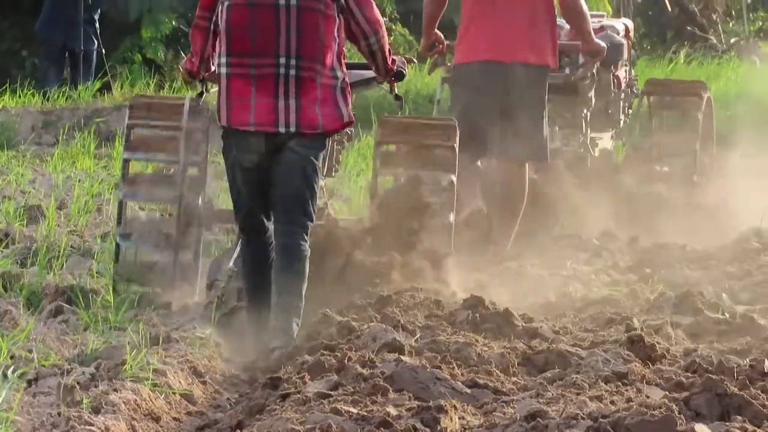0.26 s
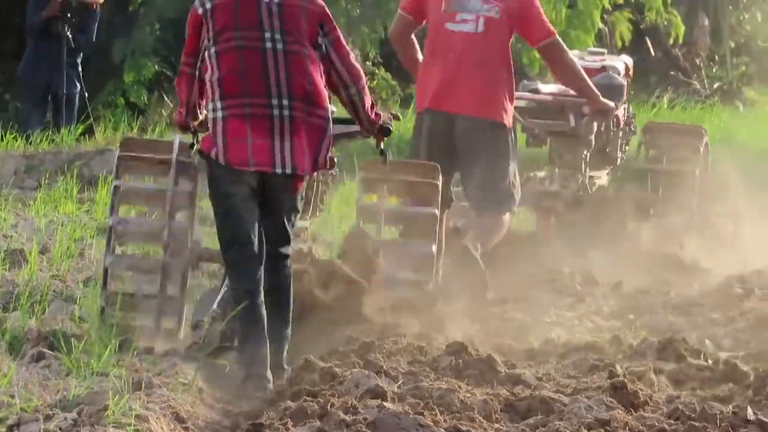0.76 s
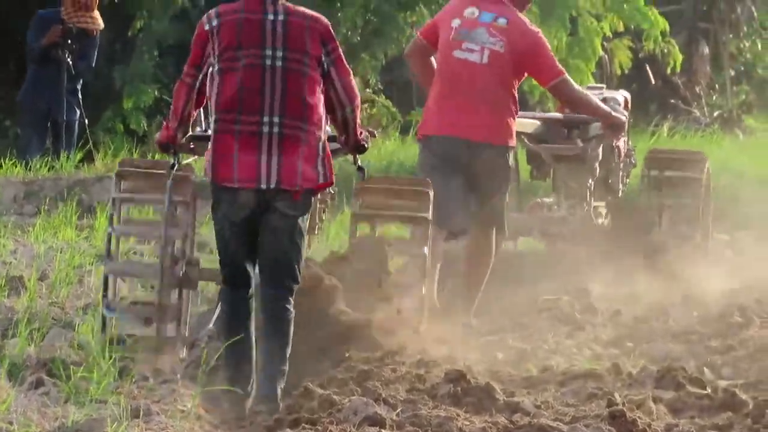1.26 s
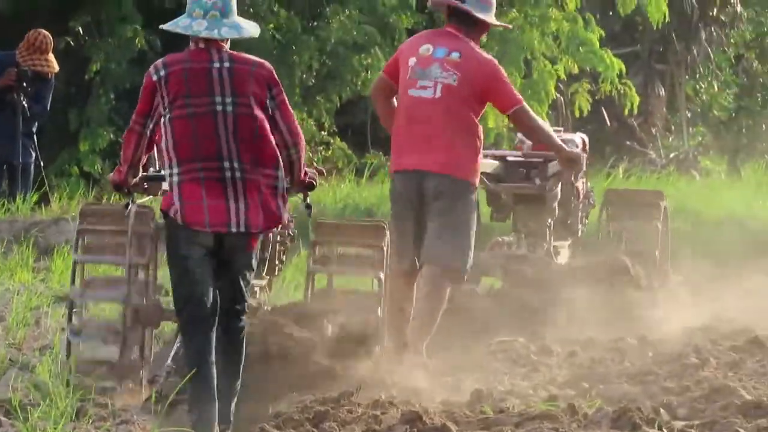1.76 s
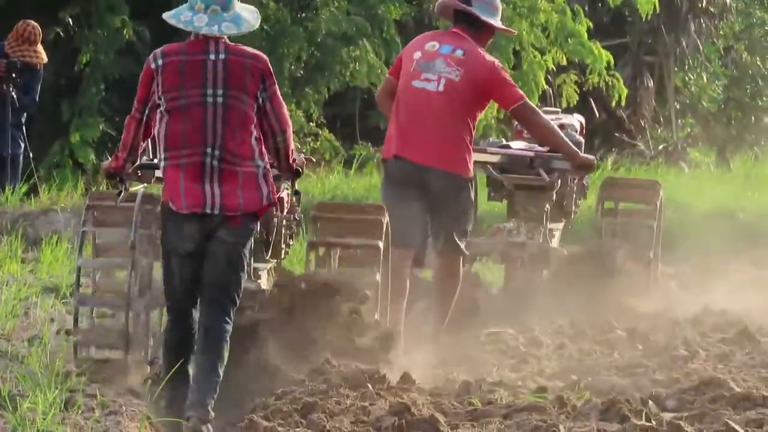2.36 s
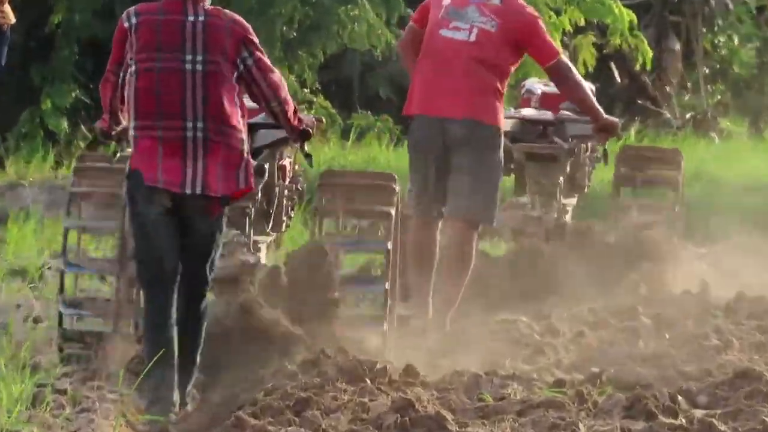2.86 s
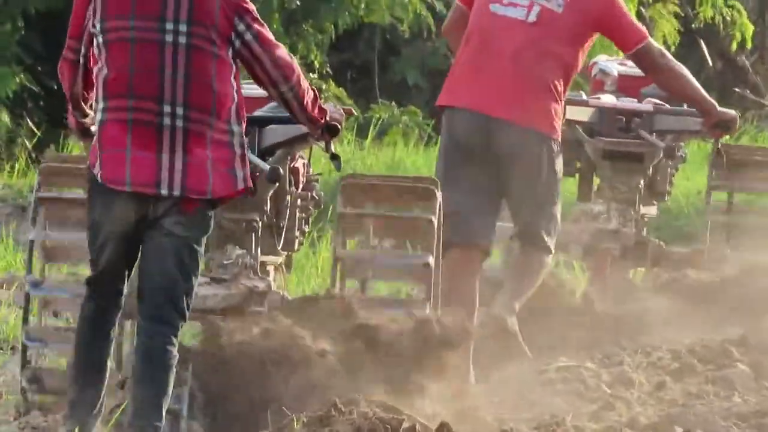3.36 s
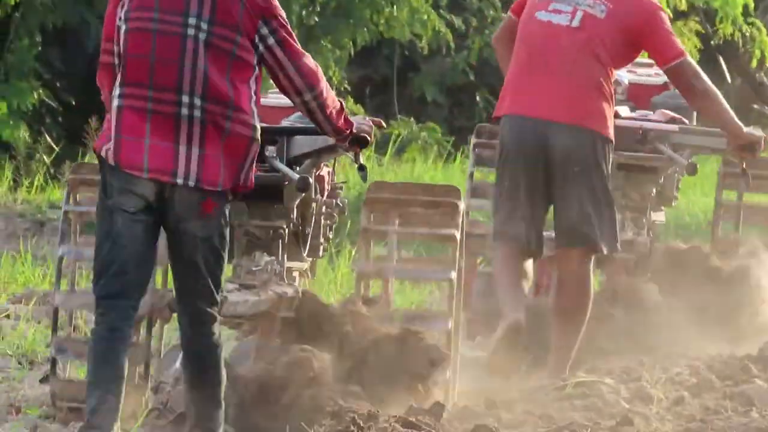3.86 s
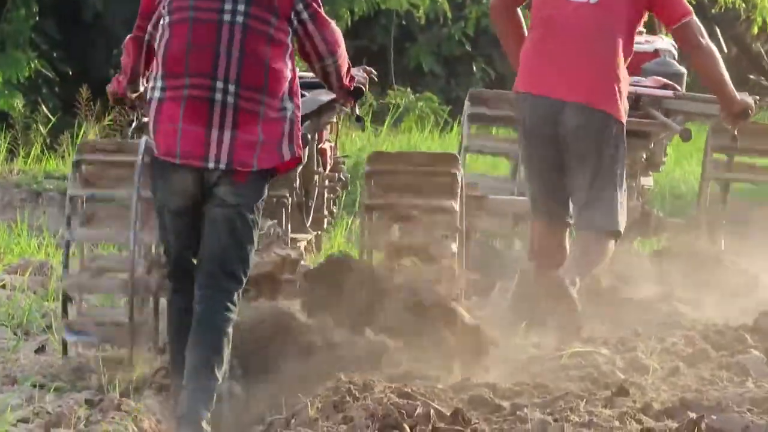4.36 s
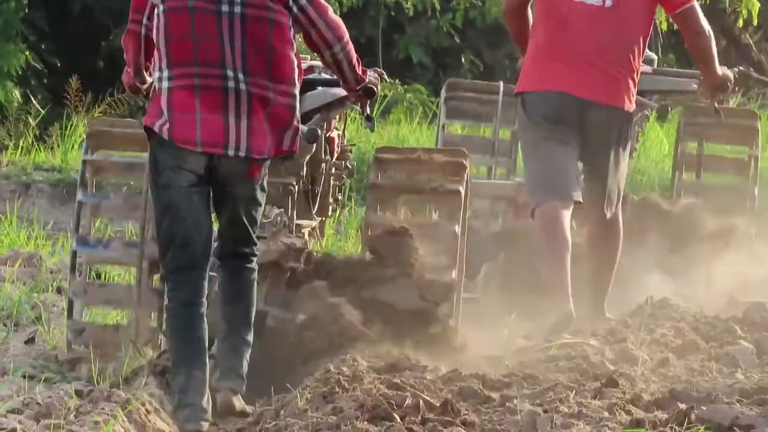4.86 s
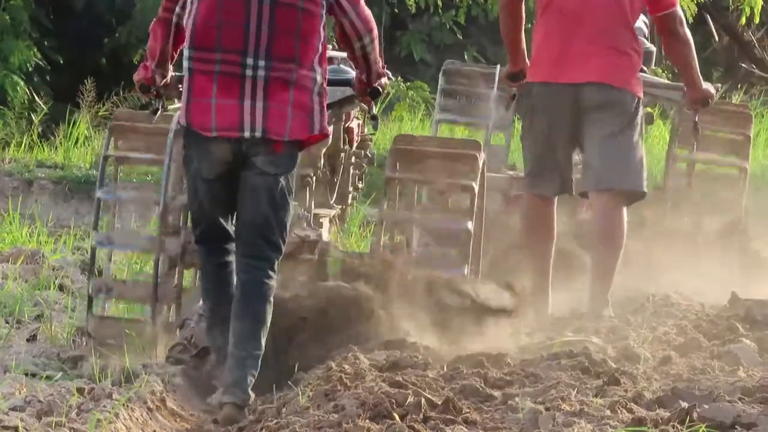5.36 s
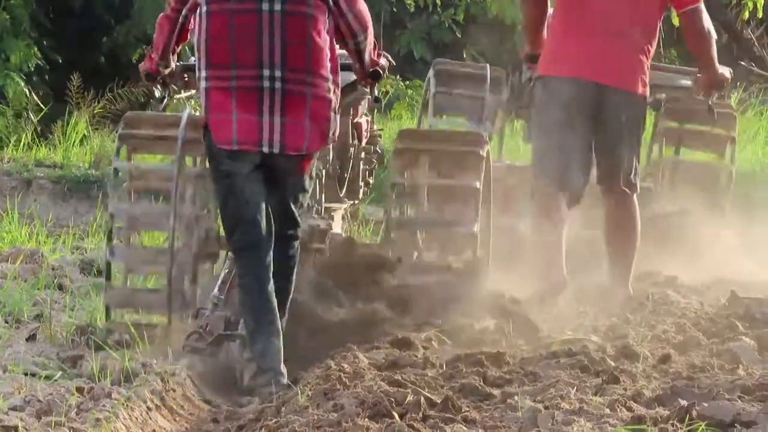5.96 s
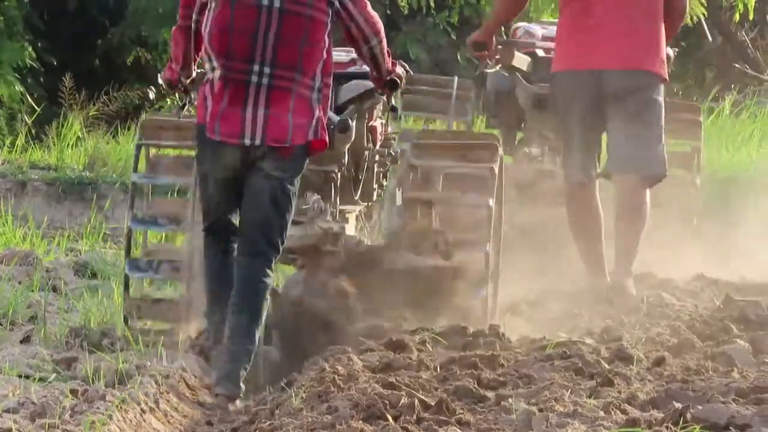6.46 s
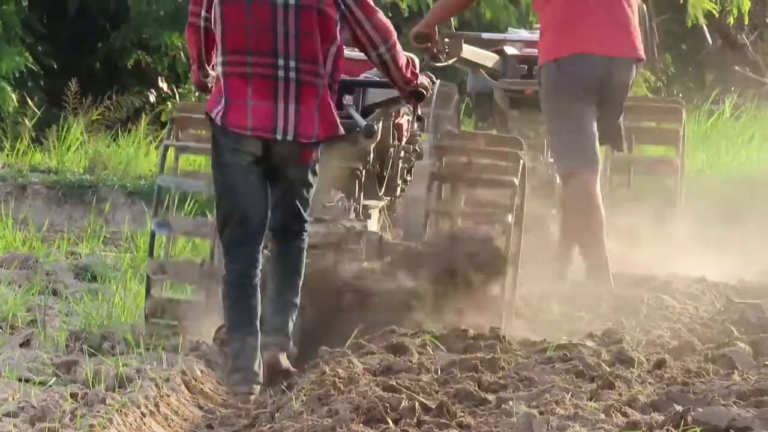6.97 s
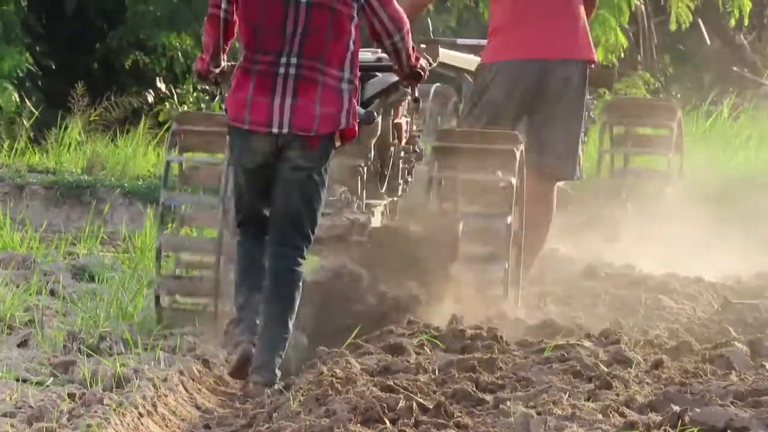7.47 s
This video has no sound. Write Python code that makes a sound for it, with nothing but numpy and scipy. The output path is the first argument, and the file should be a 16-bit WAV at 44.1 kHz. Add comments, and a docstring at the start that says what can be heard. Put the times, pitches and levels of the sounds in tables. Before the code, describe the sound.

From the start, two single-cylinder diesel walking tractors work outdoors, close to the microphone: one knocks sharply about ten times a second with bright ticks, the other more dully at nearly twelve. Their beats drift against each other inside a dense, ringing mid-range metal clatter, with loose-part rattle, thin valve ticks, a faint gear whine, soft exhaust rumble and light hiss. Small gusts thump low at 0.25-0.45 and 1.3 seconds. Knocking is strong from 1.3 to 2.6, then eases; at 2.9-3.4 the treble dulls, faint short squeaks pass, and hard metal strokes ring near 3.15. The duller engine sags to about ten and a half beats. The sharp one fades out by 4.8. Heavy wind buffeting bursts at 4.6-4.85, briefly at 5.1, and again at 6.05-6.3. Slightly quieter clatter and dull knocking continue, with a few lone ticks after 6.8, to the end around 7.7.

```python
"""Dense metal clatter and diesel knocking: two single-cylinder walking tractors plough a dry field.
Each firing is a noise burst with a bright tick; impacts ring casing resonators under a gear whine.
Loose parts rattle, valves tick and exhausts rumble; the soil returns clatter, rattle, knocks and ticks.
Gusts buffet the microphone with low thumps over faint hiss; a few squeaks glide past later."""
import sys
import numpy as np
from scipy import signal
from scipy.fft import rfft, irfft, next_fast_len
from scipy.io import wavfile
from scipy.ndimage import uniform_filter1d, map_coordinates

SR = 44100
rng = np.random.default_rng(int(sys.argv[2]) if len(sys.argv) > 2 else 0)


def waveform_to_disk(signal):
    """Save audio, clipped to [-1, 1], as 16-bit WAV at the path in sys.argv[1]."""
    frames = np.transpose(np.atleast_2d(signal))
    scaled = np.clip(frames, -1, 1) * 32767
    samples = np.round(scaled).astype(np.int16)
    wavfile.write(sys.argv[1], SR, samples)


N = 340893
TIME = np.arange(N) / SR


def undb(db):
    """Amplitude gain of a level in dB."""
    return 10 ** (np.asarray(db) / 20)


def level(x, db=0):
    """Scales x to an rms in dB."""
    return x * undb(db) / np.sqrt(np.mean(x ** 2))


def columns(table):
    """Columns of a curve table, interpolated to one value per sample."""
    s, *rest = np.transpose(table)
    return [np.interp(TIME, s, c) for c in rest]


def noise():
    """White Gaussian noise."""
    return rng.standard_normal(N)


def colour(x, spectrum):
    """Filters x by (Hz, dB) points, linear in dB over log Hz, closed outside them; rms 1."""
    size = next_fast_len(N)
    hz, db = np.transpose(spectrum)
    axis = np.log(np.arange(size // 2 + 1) * SR / size + 1)
    gain = undb(np.interp(axis, np.log(hz), db, left=-120, right=-120))
    return level(irfft(rfft(x, size) * gain, size)[:N])


def walk(rate_hz):
    """Random levels held 1 / rate_hz and slewed twice; spread near 1."""
    k = int(SR / rate_hz)
    held = np.repeat(rng.standard_normal(N // k + 1), k)
    return 1.3 * uniform_filter1d(uniform_filter1d(held, k), k)[:N]


def bursts(times_s, dbs, rise_s, fall_s):
    """Envelope that swells at each time and dies away exponentially."""
    starts = np.zeros(N)
    index = np.clip((np.asarray(times_s) * SR).astype(int), 0, N - 1)
    np.add.at(starts, index, undb(dbs))
    t = TIME[:SR // 8]
    shape = (1 - np.exp(-t / rise_s)) ** 3 * np.exp(-t / fall_s)
    return signal.oaconvolve(starts, shape / shape.max())[:N]


def blows(spread_db):
    """Gains of random blows, one per 128 samples; exponential in dB, capped."""
    size = np.minimum(rng.exponential(size=N // 128 + 1), 3.5)
    return np.repeat(undb(spread_db * size), 128)[:N]


def span(start_s, end_s, rise, fall):
    """Zero from start to end, sloping down before and after at rise and fall per s."""
    return np.minimum(0, rise * (TIME - start_s)) + np.minimum(0, fall * (end_s - TIME))


PATCH_HZ, PATCH_S = 430, .05  # grid on which the loudness of ringing parts varies


def patchy(spread_db):
    """Noise whose narrow bands come and go on their own, as when each blow rings other parts."""
    hz, s, z = signal.stft(noise(), SR, nperseg=512)
    cells = rng.standard_normal((int(hz[-1] / PATCH_HZ) + 2, int(s[-1] / PATCH_S) + 2))
    grid = np.meshgrid(hz / PATCH_HZ, s / PATCH_S, indexing="ij")
    db = map_coordinates(cells, grid, order=1)
    return signal.istft(z * undb(1.4 * spread_db * db), SR)[1][:N]


KNOCK_SCATTER_DB, TICK_SCATTER_DB = 1.5, 3  # largest departure either way


def firings(speed, wait_cycles, force, tick_db, bright=()):
    """One row per engine cycle: time s, knock dB, tick dB above it; knock and tick scatter independently."""
    rate_hz, = columns(speed)
    cycles = np.cumsum(rate_hz) / SR - wait_cycles
    s = np.interp(np.arange(int(cycles[-1]) + 1), cycles, TIME)
    knock = KNOCK_SCATTER_DB * rng.uniform(-1, 1, len(s))
    tick = TICK_SCATTER_DB * rng.uniform(-1, 1, len(s))
    for when_s, extra_db in bright:
        tick[np.argmin(abs(s - when_s))] = extra_db
    force_db = np.interp(s, *np.transpose(force))
    return np.transpose([s, force_db + knock, tick_db + tick - knock])


# Speed of the sharp engine. Each row: time in seconds, firings per second.
SHARP_SPEED = [(0, 10.096), (1.5, 10.209), (2.7, 10.053), (3.3, 10.197), (3.6, 10.363), (4.75, 10.457)]
# Its knock strength. Each row: time in seconds, level in dB.
SHARP_FORCE = [(0, -41), (.4, -41), (.7, -38), (1.0, -41.5), (1.4, -33.5), (1.7, -35.5), (2.0, -44),
               (2.2, -35.5), (2.6, -35), (2.76, -46.5), (3.2, -50), (3.55, -42), (3.95, -43), (4.1, -54),
               (4.35, -42), (4.62, -44), (4.8, -78)]
# Its brightest knocks. Each row: time in seconds, tick in dB above the usual.
BRIGHT_KNOCKS = [(.397, 9), (.891, 5), (1.382, 7.5), (1.775, 5), (2.168, 5), (2.366, 0), (3.453, 5),
                 (3.839, 5)]
SHARP_WAIT_CYCLES, SHARP_TICK_DB = .028, -11.5


def sharp_firings():
    """The engine with the sharp knock fires once per cycle at a nearly steady rate."""
    return firings(SHARP_SPEED, SHARP_WAIT_CYCLES, SHARP_FORCE, SHARP_TICK_DB, BRIGHT_KNOCKS)


# Speed of the engine that slows under load. Each row: time in seconds, firings per second.
SLOWING_SPEED = [(0, 11.59), (.7, 11.825), (1.7, 11.922), (2.6, 11.824), (3.1, 10.964), (4.3, 10.552),
                 (5.4, 10.386), (7.73, 10.42)]
# Its knock strength. Each row: time in seconds, level in dB.
SLOWING_FORCE = [(0, -32), (.2, -34.5), (.45, -38), (.85, -45), (1.1, -41), (1.3, -35.5), (1.75, -33),
                 (2.2, -36.5), (2.53, -35), (2.61, -43), (3.0, -43.5), (3.18, -37.5), (3.33, -39.5),
                 (3.41, -38), (4.0, -38), (4.25, -34), (4.6, -41.5), (4.95, -33), (5.2, -41), (5.5, -37),
                 (5.92, -38), (6.15, -44), (6.5, -35.5), (6.72, -40), (7.05, -34.5), (7.3, -34.5),
                 (7.5, -48), (7.73, -38)]
SLOWING_WAIT_CYCLES, SLOWING_TICK_DB = .858, -23


def slowing_firings():
    """The loaded engine fires once per cycle at a sagging rate."""
    return firings(SLOWING_SPEED, SLOWING_WAIT_CYCLES, SLOWING_FORCE, SLOWING_TICK_DB)


# Clatter level. Each row: time in seconds, level in dB.
CLATTER_LEVEL = [(0, -26), (.43, -28), (.95, -29), (1.68, -26), (2.56, -28.5), (2.82, -31), (2.91, -29),
                 (3.72, -30.5), (3.92, -28.5), (4.6, -30.5), (4.8, -32.5), (5.2, -30), (5.4, -32.5),
                 (6.4, -30.5), (6.85, -30), (7.73, -30)]
# Casing resonances. Each row: frequency in Hz, width in Hz, relative level in dB,
# change as the machines turn away in dB per s.
CASINGS = [(717, 205, -8.5, 0), (1005, 23, -5, 1.5), (1060, 46, -12, 0), (1115, 19.3, -1, -0.44),
           (1134, 47, -7, 1), (1240, 83, -8, -1), (1431, 115, -1.5, 0.6), (1590, 140, -10.5, 1.8),
           (1685, 18, -9, -1.2), (2273, 47, -4.5, 0), (2324, 38, -6, -1), (2346, 104, -6.5, 0),
           (2880, 57, -20, -0.5), (3300, 140, -16.5, 1)]
# Hardest metal strokes on the casings. Each row: time in seconds, level in dB above the clatter.
STROKES = [(.148, 3), (.229, -1), (.296, 5), (.321, 1), (.406, -1), (.583, -6), (.677, -4), (.753, 1),
           (.79, 3), (.924, 0), (.99, 3), (1.091, 6), (1.176, 2), (1.265, 2), (1.283, 6), (1.344, 7),
           (1.514, 0), (1.557, 5), (1.62, -3), (1.687, 9), (1.705, -1), (1.765, 5.5), (1.8, 0), (1.859, 2),
           (1.935, -1), (2.051, 6), (2.103, 0), (2.132, 5), (2.262, -1), (2.354, -6), (2.394, 1),
           (2.96, -1), (3.036, 1), (3.117, 4), (3.14, 10), (3.158, 6), (3.225, 8), (3.36, 7), (3.6, -2),
           (3.876, 2), (4.03, -4), (4.063, 0), (4.146, 3), (4.251, 0), (4.36, 8), (4.54, 3), (4.67, 5),
           (4.922, 3), (5.111, 1), (5.48, -2), (5.628, 3), (5.688, 2), (6.166, 1), (6.459, 2), (6.579, -3),
           (6.841, 4), (6.906, -4), (7.033, -9), (7.155, -9), (7.321, 7), (7.608, -4), (7.714, 3)]
# Broad clatter spectrum. Each row: frequency in Hz, relative density in dB per Hz.
CLATTER_SPECTRUM = [(200, -42), (300, -17), (450, -19), (700, -5.5), (900, -6.5), (1500, -6.5), (2100, -10),
                    (2700, -12), (3500, -26), (4200, -67)]
STROKE_RISE_S, STROKE_FALL_S = 0.0005, 0.0063
THROB_REF_DB, THROB_FOLLOWS = -21, 0.37  # reference knock; dB of throb per dB of knock
SWELL_SHARE, SWELL_FALL_S = .45, .06  # clatter of the loaded engine sags through each cycle
WAVER_SHARE, WAVER_RATE_HZ = .0035, 3  # casing pitch wanders
CASING_TOP_HZ = 3380
GEAR_HZ, GEAR_DB = 678, -17  # level relative to the clatter
SURGE_DB, SURGE_RATE_HZ = .5, 7.0


def casings(impacts, throb):
    """Noisy impacts drive resonators; a varying delay wavers their pitch."""
    rings = 0
    for hz, width_hz, db, turn_db_s in CASINGS:
        drift = undb(1.2 * walk(18) + .6 * walk(2.5))
        drive = noise() * impacts * drift * (1 + 0.15 * throb)
        ring = level(signal.lfilter(*signal.iirpeak(hz, hz / width_hz, SR), drive), db)
        ring = ring * undb(turn_db_s * (TIME - TIME.mean()))
        warped = TIME + np.cumsum(WAVER_SHARE * walk(WAVER_RATE_HZ)) / SR
        rings = rings + np.interp(warped, TIME, ring)
    return signal.sosfilt(signal.butter(8, CASING_TOP_HZ, fs=SR, output="sos"), rings)


def gear_whine():
    """Gear mesh: a sine with wandering pitch and level."""
    hz = GEAR_HZ * (1 + 0.00391 * walk(5))
    return undb(GEAR_DB + 1.5 * walk(3.96)) * np.sin(2 * np.pi * np.cumsum(hz) / SR)


def clatter(sharp, slowing):
    """Dense metal impacts, harder after each firing, ring the casings; a gear mesh whines."""
    s, knock_db, _ = np.r_[sharp, slowing].T
    throb = bursts(s, THROB_FOLLOWS * (knock_db - THROB_REF_DB), 0.00027, 0.0018)
    swell = bursts(slowing[:, 0], 0, .001, SWELL_FALL_S)
    strokes = bursts(*np.transpose(STROKES), STROKE_RISE_S, STROKE_FALL_S)
    impacts = blows(1.4) * np.hypot(1 + SWELL_SHARE * swell, strokes)
    rings = level(casings(impacts, throb))
    broad = colour(noise() * impacts * (1 + 0.052 * throb), CLATTER_SPECTRUM)
    clatter_db, = columns(CLATTER_LEVEL)
    gain = undb(clatter_db + SURGE_DB * walk(SURGE_RATE_HZ))
    return gain * (level(rings + undb(0.5) * broad) + gear_whine())


KNOCK_PATCH_DB = 2.5


def knocks(rows, spectrum, tick_spectrum, rise_s, fall_s, tick_fall_s, tail_db):
    """Diesel knock: a burst of a few ms, a brighter tick on top, and the block ringing on."""
    s, db, tick_db = np.transpose(rows)
    body = bursts(s, db, rise_s, fall_s) + bursts(s, db + tail_db, 0.0019, 0.01)
    tick = bursts(s - rise_s, db + tick_db, 2 * rise_s, tick_fall_s)
    body_noise = colour(patchy(KNOCK_PATCH_DB), spectrum)
    tick_noise = colour(patchy(KNOCK_PATCH_DB), tick_spectrum)
    return body * body_noise + tick * tick_noise


# Loaded engine's knock spectrum. Each row: frequency in Hz, relative density in dB per Hz.
SLOWING_KNOCK = [(1500, -18), (2300, 7), (3300, -4.5), (3800, -1), (4050, -8), (4300, -7), (5500, -13),
                 (8000, -19), (9000, -34)]
# Its dull tick spectrum. Each row: frequency in Hz, relative density in dB per Hz.
DULL_TICK = [(7500, -26), (8500, -5), (10000, -7), (12000, -26), (14000, -12), (15500, -39)]


def slowing_knocks(slowing):
    """Fast onset, long fall and a strong ringing tail."""
    return knocks(slowing, SLOWING_KNOCK, DULL_TICK, 0.00036, 0.0037, 0.0069, -4.0)


# Sharp engine's knock spectrum. Each row: frequency in Hz, relative density in dB per Hz.
SHARP_KNOCK = [(1800, -21), (2400, 4), (4000, 2), (6200, -6), (8000, -13.5), (9000, -39)]
# Bright tick spectrum, also of the valves. Each row: frequency in Hz, relative density in dB per Hz.
BRIGHT_TICK = [(5500, -20), (7500, -6), (8600, -3), (9500, -4), (9800, -1), (10100, -4), (12000, -5),
               (13500, -8), (15500, -20)]


def sharp_knocks(sharp):
    """Short fall and a weak ringing tail."""
    return knocks(sharp, SHARP_KNOCK, BRIGHT_TICK, 0.0015, 0.0019, 0.0026, -12.0)


# Lone thin ticks. Each row: time in seconds, envelope peak in dB.
TICKS = [(6.8039, -55), (6.9364, -59), (7.0618, -54), (7.1916, -60), (7.5832, -55)]
VALVE_LEAD_S, VALVE_DB = 0.0233, -12  # level relative to the knock's tick


def valves(sharp):
    """A valve seats with a thin tick shortly before each sharp knock; a few lone ticks come later."""
    s, db, tick_db = np.transpose(sharp)
    scatter_db = 2.9 * rng.standard_normal(len(s))
    seats = bursts(s - VALVE_LEAD_S, db + tick_db + VALVE_DB + scatter_db, .0014, 0.006)
    lone = bursts(*np.transpose(TICKS), 0.0014, 0.0036)
    return (seats + lone) * colour(noise(), BRIGHT_TICK)


DULL_FROM_S, DULL_TO_S, DULL_EDGE_S = 2.9, 3.39, 0.033


def dullness():
    """1 while the treble briefly dulls, else 0, with sloping edges."""
    slopes = span(DULL_FROM_S + DULL_EDGE_S, DULL_TO_S - DULL_EDGE_S, 0.94, 0.71)
    return np.clip(1 + slopes / DULL_EDGE_S, 0, 1)


# Fine rattle, changing as the machines draw away.
# Each row: time in seconds, level in dB, top band in dB above it.
RATTLE_LEVEL = [(0, -48.5, -17), (.6, -48, -17), (1.2, -48, -17), (2.4, -47, -19), (2.88, -55.5, -15),
                (3.41, -47, -21), (3.95, -49.5, -18), (4.4, -54.5, -15), (4.6, -53, -19), (5.3, -52.5, -22),
                (6.4, -50.5, -26), (6.8, -51.5, -17), (7.73, -49.5, -23)]
# Rattle spectrum. Each row: frequency in Hz, relative density in dB per Hz.
RATTLE_SPECTRUM = [(2800, 5.5), (3600, 16.5), (5000, 3.5), (7000, -2), (9000, -13), (10000, -63)]
# Top band spectrum. Each row: frequency in Hz, relative density in dB per Hz.
RATTLE_TOP = [(8000, -25), (9000, 0), (11000, -4), (13000, -8), (14800, -13), (15500, -25)]
DULL_RATTLE_DB, DULL_RATTLE_TOP_DB = -14, 10  # changes while dulled
RATTLE_PATCH_DB = 2.5


def rattle():
    """Loose parts and flying grit: fine noise grains of uneven size."""
    rattle_db, top_db = columns(RATTLE_LEVEL)
    dull = dullness()
    rattle_db = rattle_db + DULL_RATTLE_DB * dull
    top_db = top_db + DULL_RATTLE_TOP_DB * dull + 1.6 * walk(3.19)
    grains = uniform_filter1d(blows(2.8), size=128)
    grit = patchy(RATTLE_PATCH_DB) * grains * undb(1.5 * walk(9))
    return undb(rattle_db) * (colour(grit, RATTLE_SPECTRUM) + undb(top_db) * colour(grit, RATTLE_TOP))


# Dips of the soil path. Each row: frequency in Hz, width in Hz, depth from 0 to 1.
GROUND_DIPS = [(880, 90, .68), (1300, 70, .35), (2600, 150, .62), (3135, 130, .55), (3780, 130, .35)]
GROUND_ECHO_S, GROUND_SHARE = 0.001768, 0.18


def ground(x):
    """The second path off the soil arrives later and combs the spectrum, deepest at a few dips."""
    lag = int(GROUND_ECHO_S * SR)
    echo = np.r_[np.zeros(lag), x[:-lag]]
    x = (x + GROUND_SHARE * echo) / np.hypot(1, GROUND_SHARE)
    for hz, width_hz, depth in GROUND_DIPS:
        x = x - min(depth, 1) * signal.lfilter(*signal.iirpeak(hz, hz / width_hz, SR), x)
    return x


# Exhaust spectrum. Each row: frequency in Hz, relative density in dB per Hz.
RUMBLE = [(20, -21), (40, 12), (62, 16), (100, 20), (160, -6), (250, -41.5), (400, -30)]
RUMBLE_DB = -48


def exhausts():
    """Exhaust rumble: low noise of wandering level."""
    return undb(RUMBLE_DB + 2.9 * walk(2.89)) * colour(noise(), RUMBLE)


# Hiss alike in left and right. Each row: frequency in Hz, relative density in dB per Hz.
ALIKE_HISS = [(2500, -7.5), (4000, 3.5), (7000, -8.5), (10000, -15.5), (12000, -21.5), (14000, -34),
              (15500, -61)]
# Wide hiss, opposite in left and right. Each row: frequency in Hz, relative density in dB per Hz.
WIDE_HISS = [(1700, -35), (1980, 5), (2150, -20), (2400, 1), (3500, -6), (5000, -4.5), (9000, -12.5),
             (12000, -12.5), (15000, -19), (15600, -29)]
ALIKE_HISS_DB, WIDE_HISS_DB = -52, -54  # at the start
HISS_FADE_DB_S, DULL_HISS_DB = -0.43, -4.5  # steady fade; change while dulled


def hiss():
    """Faint diffuse hiss, fading slowly: mid and side."""
    gain = undb(DULL_HISS_DB * dullness() + HISS_FADE_DB_S * TIME)
    alike = gain * undb(ALIKE_HISS_DB) * colour(noise(), ALIKE_HISS)
    wide = gain * undb(WIDE_HISS_DB) * colour(noise(), WIDE_HISS)
    return alike, wide


# Gusts on the microphone. Each row: start in seconds, length in seconds, low buffeting in dB,
# upper part in dB above it.
GUSTS = [(0.026, 0.025, -40.5, -12), (0.14, 0.08, -35, -6.5), (0.252, 0.032, -27.5, -1.5),
         (0.33, 0.047, -31, -6), (0.43, 0.023, -36, -2), (0.712, 0.14, -39, -10),
         (1.265, 0.09, -36.5, -3.5), (1.412, 0.057, -38, -7.5), (1.684, 0.024, -36, -9),
         (1.936, 0.03, -45, -12), (2, 0.016, -41, -7), (2.437, 0.1, -37, -8.5), (2.65, 0.018, -39, -20),
         (2.74, 0.13, -39.5, -10.5), (3.293, 0.026, -33, -11), (3.387, 0.018, -37.5, -19),
         (3.5, 0.14, -35.5, -5.5), (3.69, 0.02, -38, -3), (3.856, 0.04, -34.5, -10),
         (3.978, 0.035, -34.5, -5.5), (4.157, 0.046, -30, -6.5), (4.244, 0.1, -34.5, -0.5),
         (4.42, 0.089, -36, -10.5), (4.58, 0.095, -22, 1), (4.68, .022, -25.5, -2),
         (4.725, .04, -24.5, -2.5), (4.764, 0.088, -23.5, -2.5), (5.066, 0.021, -28.5, -1),
         (5.083, 0.042, -39, 6.5), (5.16, 0.091, -39.5, -10), (5.31, 0.04, -45.5, 1),
         (5.496, 0.095, -37.5, -12.5), (5.708, 0.031, -35.5, -1.5), (5.826, 0.025, -31.5, -4.5),
         (5.873, 0.15, -39.5, -7.5), (6.037, .01, -27, -14), (6.057, 0.084, -21.5, 0.5),
         (6.155, .02, -29, -3), (6.189, 0.09, -26.5, -5), (6.296, 0.058, -37, -4),
         (6.786, 0.18, -41.5, -8.5), (7.06, 0.05, -33, -5), (7.137, 0.018, -35, -4),
         (7.166, .13, -38.5, -7.5)]
BREEZE_DB, BREEZE_UPPER_DB = -49, -7  # upper part relative to the low part
GUST_RISE_DB_S, GUST_FALL_DB_S = 597, 374
STRONG_GUST_DB, STRONG_FALL_DB_S = -26, 1800  # gusts above this level stop short


def gusting():
    """Each gust swells, holds and dies down over a light breeze: gains of low and upper part."""
    low, upper = undb(BREEZE_DB), undb(BREEZE_DB + BREEZE_UPPER_DB)
    for s, length_s, db, upper_db in GUSTS:
        fall = STRONG_FALL_DB_S if db > STRONG_GUST_DB else GUST_FALL_DB_S
        gust = undb(db + span(s, s + length_s, GUST_RISE_DB_S, fall))
        low = np.hypot(low, gust)
        upper = np.hypot(upper, gust * undb(upper_db))
    return low, upper


# Single hard eddies. Each row: time in seconds, peak in dB, pitch in Hz.
EDDIES = [(0.163, -21, 202), (0.254, -14, 280), (0.269, -13.5, 221), (0.323, -15, 247), (0.371, -21, 161),
          (.422, -22, 215), (.452, -22, 172), (0.662, -31, 150), (1.263, -23, 180), (1.297, -21, 160),
          (1.309, -15.5, 365), (1.352, -21, 175), (1.378, -22, 140), (1.453, -22.5, 240), (1.642, -26, 200),
          (1.686, -25, 200), (2.017, -20.5, 380), (2.465, -27, 128), (2.808, -24.5, 170), (3.317, -21, 160),
          (3.576, -20.5, 135), (3.625, -17, 195), (3.69, -18, 164), (3.896, -31, 156), (3.984, -22.5, 160),
          (3.999, -23, 317), (4.011, -21.5, 250), (4.188, -16, 206), (4.24, -17.5, 183),
          (4.284, -16.5, 229), (4.302, -11.5, 257), (4.339, -19, 237), (4.412, -25, 130),
          (4.486, -18.5, 212), (4.585, -11, 294), (4.595, -16, 260), (4.612, -5.5, 245), (4.632, -18, 680),
          (4.64, -4, 282), (4.666, -7.5, 272), (4.682, -14, 169), (4.7, -21, 200), (4.75, -17, 180),
          (4.761, -13, 250), (4.778, -5.5, 242), (4.801, -16, 199), (4.829, -7, 182), (4.851, -16, 182),
          (5.03, -25, 140), (5.059, -10.5, 286), (5.094, -11, 346), (5.117, -16, 342), (5.16, -15, 260),
          (5.289, -24, 200), (5.338, -24.5, 191), (5.691, -28, 150), (5.819, -22.5, 180), (5.897, -20, 203),
          (6.06, -4, 274), (6.081, -6, 203), (6.092, -13, 330), (6.107, -8, 230), (6.117, -13.5, 350),
          (6.129, -11, 190), (6.143, -12, 230), (6.148, -13, 370), (6.192, -12.5, 261), (6.202, -14, 250),
          (6.219, -10.5, 326), (6.235, -15, 150), (6.25, -16, 202), (6.259, -18, 276), (6.288, -21, 230),
          (7.08, -21, 140), (7.094, -24, 110), (7.116, -17, 326), (7.144, -24, 150), (7.158, -23, 200)]
# Low buffeting spectrum. Each row: frequency in Hz, relative density in dB per Hz.
WIND_LOW = [(20, -43), (50, -24), (80, -9.5), (115, -2), (165, -1.5), (230, -8.5), (300, -23.5)]
# Upper buffeting spectrum. Each row: frequency in Hz, relative density in dB per Hz.
WIND_HIGH = [(200, -18.5), (260, -1), (400, 1), (490, -4.5), (545, -18), (750, -22), (900, -38)]
# Spectrum of the wide part of the gusts. Each row: frequency in Hz, relative density in dB per Hz.
WIND_SIDE = [(140, -33), (180, -14), (260, -3), (380, 4), (480, 3), (560, -9.5), (1200, -20), (1900, -22),
             (2300, -43)]
EDDY_CALM = .6  # share of the buffeting that a hard eddy displaces
WIND_WIDTH_DB, WIND_WIDTH_GROWTH = -7.5, 1.52  # side gain; exponent on the upper gain


def wind():
    """Eddies of uneven strength shake the membranes; strong gusts sound wider: mid and side."""
    low, upper = gusting()
    flutter = noise() * undb(1.8 * walk(80))
    mid = low * colour(flutter, WIND_LOW) + upper * colour(flutter, WIND_HIGH)
    t = TIME[:1024] - 512 / SR
    phases = rng.uniform(0, 2 * np.pi, len(EDDIES))
    for (s, db, hz), phase in zip(EDDIES, phases):
        start = int(s * SR) - 512
        shape = np.exp(-(t * hz / .7) ** 2)
        mid[start:start + len(t)] *= 1 - EDDY_CALM * shape
        mid[start:start + len(t)] += undb(db) * shape * np.cos(2 * np.pi * hz * t - phase)
    side = upper ** WIND_WIDTH_GROWTH * undb(WIND_WIDTH_DB) * colour(noise(), WIND_SIDE)
    return mid, side


# Faint squeaks. Each row: start in seconds, length in seconds, start pitch in Hz, end pitch in Hz,
# peak in dB.
SQUEAKS = [(2.978, .018, 3670, 3500, -41), (3.026, 0.024, 3500, 3820, -40), (3.055, 0.02, 4850, 4850, -47),
           (3.158, 0.015, 4860, 4950, -54), (3.35, .018, 3600, 3630, -48)]


def squeaks():
    """Short whistles: sines gliding linearly under a Hann window."""
    out = np.zeros(N)
    for s, length_s, start_hz, end_hz, db in SQUEAKS:
        size, start = int(length_s * SR), int(s * SR)
        phase = 2 * np.pi * np.cumsum(np.linspace(start_hz, end_hz, size)) / SR
        out[start:start + size] += undb(db) * np.hanning(size) * np.sin(phase)
    return out


LEAN_BAND_HZ, LEAN_DB = (2800, 6000), -25  # this band sits slightly to the right


def scene():
    """Sums the sources as mid and side and returns left and right."""
    sharp, slowing = sharp_firings(), slowing_firings()
    machines = clatter(sharp, slowing) + slowing_knocks(slowing) + sharp_knocks(sharp)
    machines = machines + valves(sharp) + rattle()
    hiss_mid, hiss_side = hiss()
    wind_mid, wind_side = wind()
    mid = ground(machines) + exhausts() + hiss_mid + wind_mid + squeaks()
    band = signal.butter(4, LEAN_BAND_HZ, "bandpass", fs=SR, output="sos")
    lean = undb(LEAN_DB) * signal.sosfiltfilt(band, mid)
    side = wind_side - lean + hiss_side
    return np.array([mid + side, mid - side])


TOP_HZ = 15600


def record(dry):
    """The recorder cuts the top steeply with an elliptic low-pass."""
    return signal.sosfilt(signal.ellip(10, .2, 80, TOP_HZ, fs=SR, output="sos"), dry)


dry = scene()
out = record(dry)
waveform_to_disk(out)
```